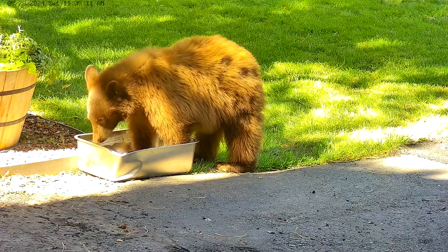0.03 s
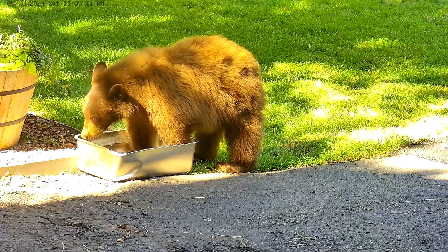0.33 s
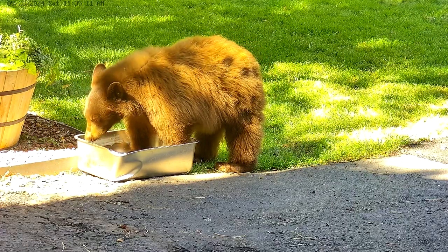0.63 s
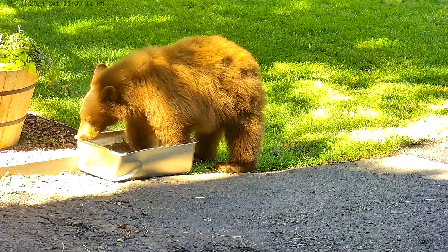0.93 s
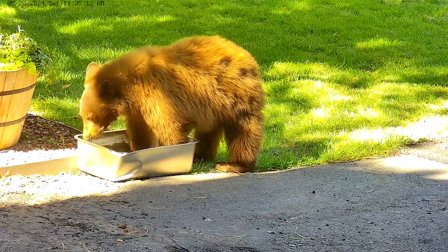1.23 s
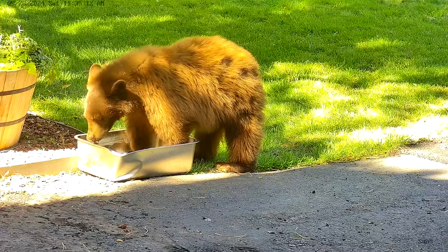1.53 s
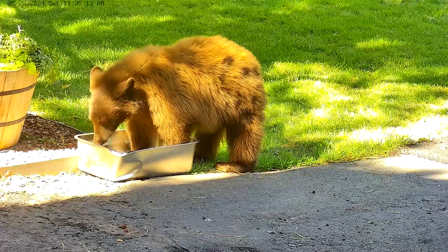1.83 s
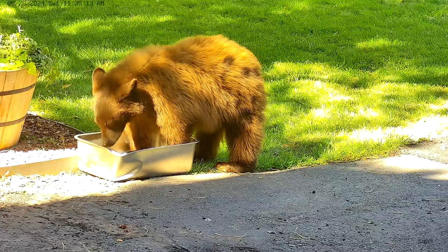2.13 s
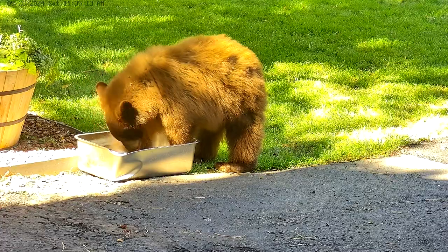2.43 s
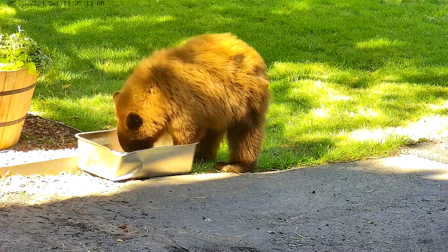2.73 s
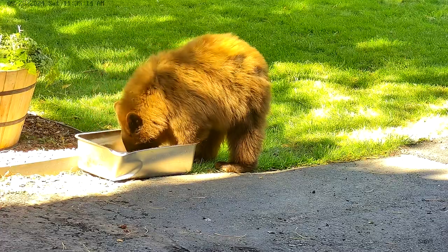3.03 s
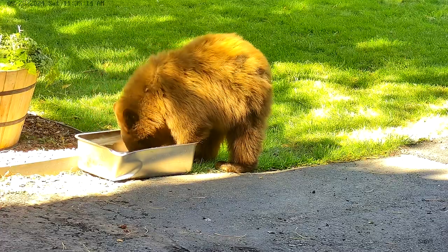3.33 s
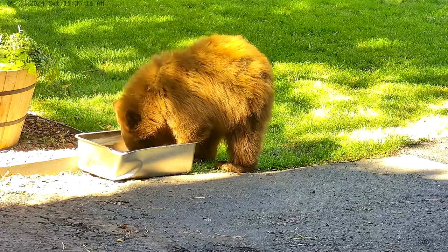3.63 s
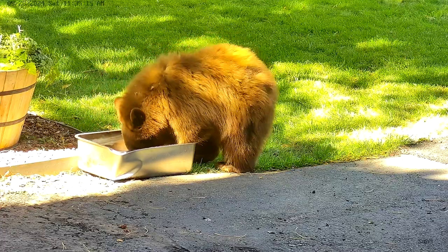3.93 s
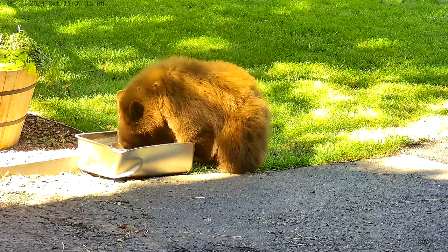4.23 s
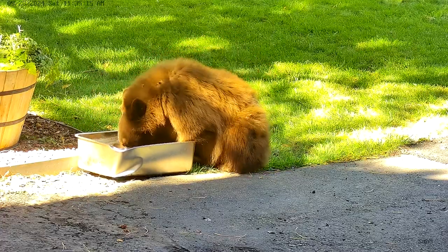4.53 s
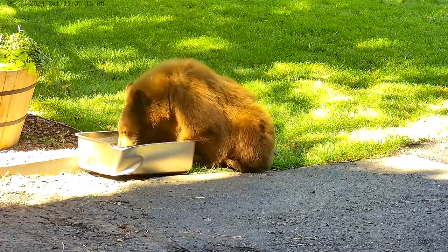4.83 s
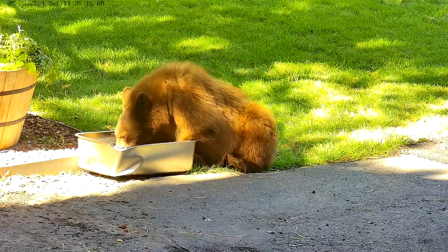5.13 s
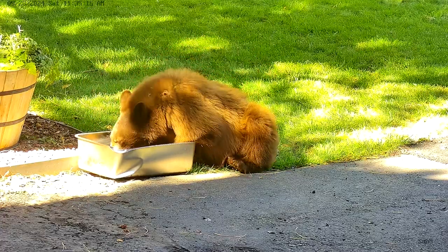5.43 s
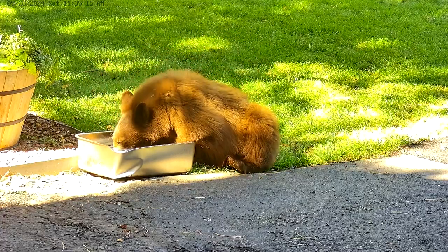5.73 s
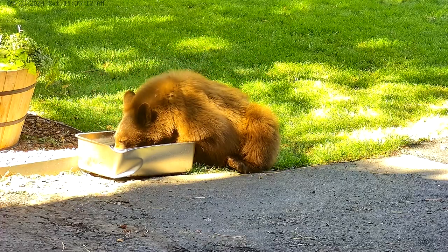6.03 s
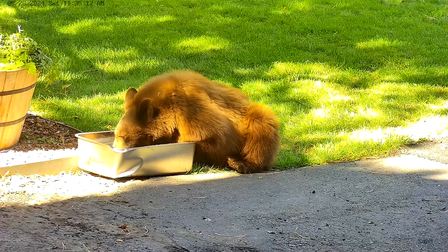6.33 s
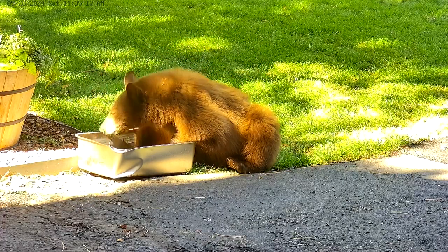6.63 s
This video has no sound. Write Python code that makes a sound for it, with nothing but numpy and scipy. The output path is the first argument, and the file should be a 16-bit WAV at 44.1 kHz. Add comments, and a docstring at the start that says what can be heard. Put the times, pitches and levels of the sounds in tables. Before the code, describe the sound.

Soft wet plops and smacks of a bear lapping from a pan, with runs of hoarse bird calls and a quiet rumble behind.

```python
"""Water laps in a shallow garden pan as a bear stirs it: bubbles ring, the tongue plops and smacks,
and two tiny high drips fall. Under it sits a bed of mains hum, low machine rumble and open air, with
a thin whine at the start. A bird scolds in runs of harsh, rising notes, hoarse harmonics shaped by
its throat and beak. The yard throws back bird and water, all heard through a small outdoor camera."""
import sys
import numpy as np
from scipy import signal
from scipy.fft import rfft, irfft
from scipy.io import wavfile

SR = 44100
rng = np.random.default_rng(int(sys.argv[2]) if len(sys.argv) > 2 else 0)


def store_wav(level_fs):
    """Save 16-bit WAV to argv[1]."""
    pcm = np.round(np.clip(np.atleast_2d(level_fs), -1, 1) * 32767)
    wavfile.write(sys.argv[1], SR, pcm.T.astype(np.int16))


N = 299439
TIME = np.arange(N) / SR

# how hard the water is stirred, and the pitch of its bubbles: t/s, level/dB, f/Hz
STIRRING = [(0.0, -43.5, 832), (0.8, -42.5, 843), (1.0, -39, 900), (1.8, -50.5, 913), (1.84, -45.5, 890),
            (2.48, -44, 872), (2.56, -47.5, 840), (2.72, -42.5, 880), (3.36, -47.5, 944), (3.48, -43, 810),
            (3.68, -47.0, 943), (4.4, -42, 850), (4.52, -46, 842), (5.12, -39.5, 910), (5.32, -48, 844),
            (6.0, -42.5, 788), (6.44, -49, 816), (6.79, -40.5, 930)]
# tone of the wet wash: f/Hz, level/dB
WASH_SPECTRUM = [(200, -16), (450, -3.5), (650, -2), (850, 5), (1050, 1), (1300, -3), (1900, -15),
                 (2900, -16), (3700, -28), (7000, -58)]
# mains partials: f/Hz, rms level/dB
HUM_PARTIALS = [(60, -49.8), (180, -53.6), (300, -63.0)]
# tone of the machine: f/Hz, level/dB
RUMBLE_SPECTRUM = [(8, -28), (30, -25), (55, -2), (70, -2), (76, -0.5), (82, -17), (130, -43), (400, -59)]
# fader ride on the machine: t/s, level/dB
RUMBLE_RIDE = [(0, -56), (1.7, -54), (2.2, -50), (3.7, -55.5), (4.6, -53), (6.79, -60)]
# still air and microphone hiss: f/Hz, level/dB
AIR_SPECTRUM = [(20, -44), (45, -22), (100, -1.5), (240, -6), (500, -5), (850, -2.5), (1600, -4),
                (3000, -16.5), (4400, -29.5), (4950, -17.5), (5300, -27.5), (6500, -12), (7600, -39.5),
                (11000, -36)]
# bands of the whine: f/Hz, level/dB
WHINE_BANDS = [(2810, -65), (2960, -65.5)]
# the loudest laps: t/s, level/dB, f/Hz
PLOP_CUES = [(0.763, -36, 827), (0.849, -35, 880), (0.921, -33, 830), (0.944, -31, 905), (0.963, -38, 843),
             (0.992, -27.5, 843), (1.015, -25, 913), (1.065, -30.5, 990), (1.089, -27.5, 894),
             (1.273, -26.5, 1010), (1.574, -36, 894), (2.76, -35, 950), (3.875, -33.5, 890),
             (5.089, -29, 990), (5.928, -33.5, 720), (6.064, -32.5, 772), (6.247, -37, 703)]
# wet smacks at the pan: t/s, snap level/dB, body level/dB
SMACK_CUES = [(0.168, -50.5, -68), (1.037, -59, -51), (1.611, -72, -54), (3.918, -64, -36.5),
              (4.1138, -47.5, -31), (4.39, -57, -42)]
# tone of a smack's snap and of its body: f/Hz, level/dB
SNAP_SPECTRUM = [(4000, -49), (5800, 4), (6700, 7), (8000, -1), (9500, -5), (11000, -12)]
BODY_SPECTRUM = [(300, -22), (1000, -15), (3000, 1), (5400, -6), (6500, 9.5), (7500, -9), (9000, -27),
                 (11000, -48)]
# splashes and gurgles: t/s, level/dB, f/Hz, half-length/s
SPLASH_CUES = [(.18, -52, 2130, 0.065), (0.882, -49.5, 1710, 0.018), (1.046, -46, 1490, 0.044),
               (1.105, -62.5, 3300, 0.043), (2.11, -49.5, 1270, 0.06), (2.45, -43.5, 630, 0.029),
               (2.795, -50.5, 1530, 0.057), (3.042, -45.5, 1040, 0.059), (3.658, -41.5, 1960, 0.032),
               (4.796, -38.5, 1480, 0.037), (4.896, -42, 970, 0.032), (5.377, -45, 633, 0.021),
               (5.65, -45, 470, 0.022), (6.178, -44.5, 2250, 0.04), (6.656, -50, 450, 0.042)]
# crests of the low thuds: t/s, level/dB
THUD_CUES = [(.25, -44), (.61, -43), (3.26, -39), (3.64, -38), (3.83, -38), (4.2, -39), (5.42, -37)]
# tiny high drips of water: t/s, level/dB, f/Hz
DRIP_CUES = [(0.488, -44, 2580), (1.037, -48, 3430)]
# the bird's notes at their crests: t/s, level/dB, fundamental f/Hz, brightness/dB, length/s
SCOLD_CUES = [(2.398, -32, 706, -1, 0.051), (2.546, -32, 697, -1, 0.066), (2.702, -33.5, 688.5, -2, 0.07),
              (3.235, -30.5, 768, -1.5, 0.054), (3.376, -30.5, 766, -1.5, 0.058),
              (3.521, -33, 748, -1, 0.096), (3.69, -32.5, 737, -2.5, 0.08), (3.884, -33, 725.4, -2, 0.066),
              (4.645, -32.5, 791, 1, 0.067), (4.787, -33.5, 753, -2.5, 0.088),
              (4.932, -34, 751, -1.5, 0.075), (5.113, -33, 765, 2, 0.084), (5.316, -34, 767, 2, 0.064),
              (5.859, -36, 742, -3.5, 0.059), (5.991, -41.5, 711, -6, 0.048),
              (6.161, -43.5, 703, -6.5, 0.055), (6.708, -35, 761, 3, 0.053)]
# resonances of the throat and open beak: f/Hz, level/dB
THROAT_SPECTRUM = [(600, -4), (1400, -7.5), (2050, 5.5), (2600, 11.5), (3200, 5.5), (3750, -6.5),
                   (4400, -5), (5200, 4.5), (5750, -2), (6400, 5), (7100, -14), (8300, -21.5),
                   (9500, -36.5), (11000, -52)]
# the yard's reverb time: f/Hz, t60/s
YARD_DECAY = [(200, 0.2), (1000, 1), (3000, 0.59), (6500, 0.55), (10000, 0.28)]


def amp(db):
    return 10 ** (np.asarray(db) / 20)


def unit(x):
    """Scales x to rms 1."""
    return x / np.sqrt(np.mean(x ** 2) + 1e-20)


def read(points, hz):
    """A curve's value at hz, on a log frequency axis."""
    f, value = np.transpose(points)
    return np.interp(np.log(hz + 1), np.log(f + 1), value)


def follow(rows):
    """Each column of a timed curve, sample by sample."""
    s, *columns = np.transpose(rows)
    return [np.interp(TIME, s, c) for c in columns]


def add(mix, s, sound):
    part = mix[max(round(s * SR), 0):][:len(sound)]
    part += sound[:len(part)]


def colour(x, spectrum):
    """EQs x with a spectrum, at rms 1."""
    return unit(irfft(rfft(x) * amp(read(spectrum, np.fft.rfftfreq(N, 1 / SR))), N))


def noise(spectrum):
    return colour(rng.standard_normal(N), spectrum)


def wander(rate_hz):
    """A smooth random modulator of rms 1, rolled off above rate_hz."""
    f = np.fft.rfftfreq(N, 1 / SR)
    return unit(irfft(rfft(rng.standard_normal(N)) / (1 + (f / rate_hz) ** 4), N))


def resonate(x, hz, width_hz):
    """A sweepable resonance of gain 1."""
    turn = np.exp(2j * np.pi * np.cumsum(hz * np.ones(len(x))) / SR)
    pole = np.exp(-np.pi * abs(width_hz) / SR)
    return 2 * (turn * signal.lfilter([1 - pole], [1, -pole], x / turn + 1e-18)).real


def swell(t, rise, fall, flat=2):
    """A bell envelope around t = 0; a greater flat gives it shoulders."""
    return np.exp(-abs(t / np.where(t < 0, rise, fall)) ** flat)


def droplets(per_s, spread_db):
    """Random tiny impacts, a few of them large."""
    size = amp(spread_db * np.minimum(rng.exponential(1, N), 3.5))
    return size * rng.choice([-1, 1], N) * (rng.random(N) < per_s / SR)


def stirring(bubbles_db=-6, wash_db=-7, width_hz=240, slosh_hz=6, slosh_db=1.5, slosh_oct=.09):
    """The muzzle stirs up a wet wash and ringing bubbles; level and pitch sway as the water rocks."""
    level_db, hz = follow(STIRRING)
    level_db += slosh_db * wander(slosh_hz)
    hz *= 2 ** (slosh_oct * wander(slosh_hz))
    pops, fizz = droplets(800, 2), droplets(2500, 2.5)
    bubbles = unit(resonate(resonate(pops, hz, width_hz), hz, width_hz))
    wash = colour(fizz, WASH_SPECTRUM)
    return amp(level_db) * (amp(bubbles_db) * bubbles + amp(wash_db) * wash)


def mains_hum():
    """A steady drone on the mains frequency and two odd harmonics."""
    return sum(np.sqrt(2) * amp(db) * np.sin(2 * np.pi * hz * TIME) for hz, db in HUM_PARTIALS)


def machine_rumble():
    """A machine's low noise, slowly rising and falling."""
    return amp(follow(RUMBLE_RIDE)[0]) * noise(RUMBLE_SPECTRUM)


def open_air(level_db=-49, flutter_db=.5):
    """A wash of air and hiss whose level wavers slightly."""
    return amp(level_db + flutter_db * wander(20)) * noise(AIR_SPECTRUM)


def whine(centre_s=.48, half_s=.72, width_hz=23):
    """Two narrow noise bands make a thin, fuzzy whine that fades after the first second."""
    bands = sum(amp(db) * unit(resonate(rng.standard_normal(N), hz, width_hz)) for hz, db in WHINE_BANDS)
    return bands * swell(TIME - centre_s, half_s, half_s, flat=8.2)


def stray_plop_cues(count=36, over_db=2, spread_db=3, spread_oct=.224):
    """Lesser plops scattered around the stirring's level and pitch: t/s, level/dB, f/Hz."""
    level_db, hz = follow(STIRRING)
    at = ((np.arange(count) + rng.random(count)) * N / count).astype(int)
    louder, higher = rng.standard_normal((count, 2)).T
    levels = level_db[at] + over_db + spread_db * louder
    return list(zip(TIME[at], levels, hz[at] * 2 ** (spread_oct * higher)))


def plops(trim_db=-2, ring_s=.0065, attack_s=.0027, sag=.1):
    """The tongue opens a pocket of air that rings for a few cycles, sinking in pitch as it grows."""
    out, t = np.zeros(N), np.arange(SR // 16) / SR
    envelope = (1 - np.exp(-t / attack_s)) * np.exp(-t / ring_s)
    envelope /= envelope.max()
    for s, db, hz in PLOP_CUES + stray_plop_cues():
        pitch = hz * (1 + sag * (2 * np.exp(-t / ring_s) - 1))
        add(out, s, amp(db + trim_db) * envelope * np.sin(2 * np.pi * np.cumsum(pitch) / SR))
    return out


def smacks(snap_s=.016, body_s=.014):
    """Wet ticks at the pan: a thin, bright snap of noise layered over a duller body."""
    snaps, bodies, t = np.zeros(N), np.zeros(N), np.arange(SR // 5) / SR
    for s, snap_db, body_db in SMACK_CUES:
        add(snaps, s, amp(snap_db) * np.exp(-t / snap_s))
        add(bodies, s, amp(body_db) * np.exp(-t / body_s))
    return snaps * noise(SNAP_SPECTRUM) + bodies * noise(BODY_SPECTRUM)


def splashes(width_share=.33, sink=.087):
    """Spray rings in a hollow of water; the gurgle drops in pitch as the hollow widens."""
    out, spray = np.zeros(N), droplets(2500, 2)
    for s, db, hz, half_s in SPLASH_CUES:
        near, width_hz = abs(TIME - s) < 3 * half_s, width_share * hz
        t = TIME[near] - s
        pitch = hz * np.exp(-sink * t / half_s)
        gurgle = unit(resonate(resonate(spray[near], pitch, width_hz), pitch, width_hz))
        out[near] += amp(db) * swell(t, half_s, half_s) * gurgle
    return out


def thuds(hz=60, half_s=.015):
    """Soft bumps in the low end: short pulses of a drifting bass tone."""
    envelope = sum(amp(db) * swell(TIME - s, half_s, half_s) for s, db in THUD_CUES)
    return envelope * np.sin(2 * np.pi * hz * TIME + wander(4))


def drips(half_s=.0032):
    """Two tiny high drips of water, each a nearly pure blip."""
    return sum(amp(db) * swell(TIME - s, half_s, half_s) * np.sin(2 * np.pi * hz * TIME)
               for s, db, hz in DRIP_CUES)


def scold_pitch(t, hz, glide=.21, spread=.25, glide_s=.026, floor_hz=612, turn_s=.026, droop_per_s=5.9):
    """A note starts level, scoops up by a slightly random amount, then bends over and sinks."""
    slide = glide * (1 + spread * rng.uniform(-1, 1))
    rising = np.maximum(hz * (1 + slide * np.tanh(t / glide_s)), floor_hz)
    return rising * np.exp(-droop_per_s * np.maximum(t - turn_s, 0))


def scolding_bird(jitter=.027, grit_db=1.6, low_db=-4, low_rasp=.4, high_rasp=.33, rise_share=.53,
                  high_early_s=.0024, whistle_db=1, whistle_share=.42, lead_s=.031, lead_half_s=.009):
    """Hoarse harmonics slide up through the throat's resonances; the fourth stands out as a whistle."""
    shake, tremble = wander(458), unit(amp(grit_db * wander(240)))
    rasp = noise(THROAT_SPECTRUM)
    dark_rasp = colour(rasp, [(3600, 0), (4400, -40)])
    bright_rasp = colour(rasp, [(3200, -40), (4000, 0)])
    orders = np.arange(2, 14)[:, None]
    flicker = np.array([unit(amp(2 * wander(120))) for _ in orders])  # each harmonic wavers on its own
    out = np.zeros(N)
    for s, db, hz, bright_db, length in SCOLD_CUES:
        rise, fall = rise_share * length, (1 - rise_share) * length
        near = abs(TIME - s) < .15
        t = TIME[near] - s
        pitch = scold_pitch(t, hz)
        phase = 2 * np.pi * np.cumsum(pitch * (1 + jitter * shake[near])) / SR
        partials = np.sin(orders * phase + 2 * np.pi * rng.random(orders.shape)) * flicker[:, near]
        voiced = partials * amp(read(THROAT_SPECTRUM, orders * pitch))
        # equal-power blend of tone and rasp in each band
        low = np.sqrt(1 - low_rasp) * unit(voiced[:4].sum(0)) + np.sqrt(low_rasp) * dark_rasp[near]
        high = np.sqrt(1 - high_rasp) * unit(voiced[4:].sum(0)) + np.sqrt(high_rasp) * bright_rasp[near]
        cry = amp(low_db) * swell(t, rise, fall, flat=3) * low
        cry += amp(bright_db) * swell(t + high_early_s, rise, fall, flat=3) * high
        lead_db = -58 - 3.5 * bright_db  # duller notes open with a stronger whistle
        lead = amp(lead_db) * swell(t + lead_s, lead_half_s, lead_half_s)
        core = amp(db + whistle_db) * swell(t, whistle_share * rise, whistle_share * fall)
        whistle = (lead + core) * partials[2]
        out[near] += tremble[near] * (amp(db) * cry + whistle)
    return out


def yard(x, early_db, tail_db, early_s):
    """Adds quick reflections off the drive and the house wall, then a thin tail from the trees."""
    t = np.arange(SR) / SR
    sign = rng.choice([-1., 1.], SR)
    early = sign * (rng.random(SR) < 500 / SR) * np.exp(-t / early_s) * (t > .002)
    scatter = sign * (rng.random(SR) < 3000 / SR) * (t > .012)
    hz, frame_s, bands = signal.stft(scatter, SR, nperseg=256)
    decay = amp(-60 * frame_s / read(YARD_DECAY, hz)[:, None])
    tail = signal.istft(bands * decay, SR, nperseg=256)[1][:SR]
    echo = amp(early_db) * early / np.linalg.norm(early) + amp(tail_db) * tail / np.linalg.norm(tail)
    return x + signal.fftconvolve(x, echo)[:N]


def scene():
    """Mono mix over a dry bed; the bird is further off, so it carries more tail than the pan."""
    pan = yard(stirring() + plops() + smacks() + splashes(), early_db=-3.5, tail_db=-11, early_s=.013)
    bed = mains_hum() + machine_rumble() + open_air() + whine() + thuds()
    drips_and_bird = yard(drips() + scolding_bird(), early_db=-8, tail_db=-9, early_s=.014)
    return (pan + bed + drips_and_bird)[None]


def record(dry, whistle_hz=8170, cutoff_hz=11200):
    """The camera adds a faint electronic whistle and cuts the top end."""
    whistle = amp(-80) * np.sin(2 * np.pi * whistle_hz * TIME)
    lowpass = signal.firwin(511, cutoff_hz, window=("kaiser", 9), fs=SR)
    return signal.oaconvolve(dry + whistle, lowpass[None], "same")


dry = scene()
out = record(dry)
store_wav(out)
```